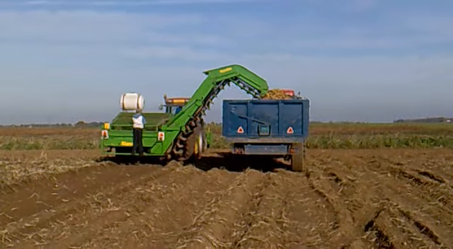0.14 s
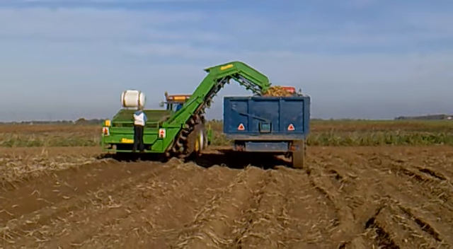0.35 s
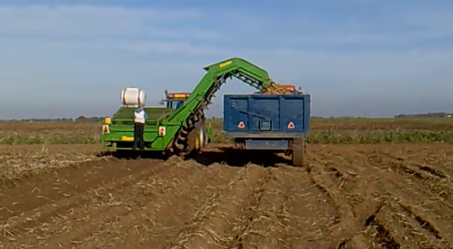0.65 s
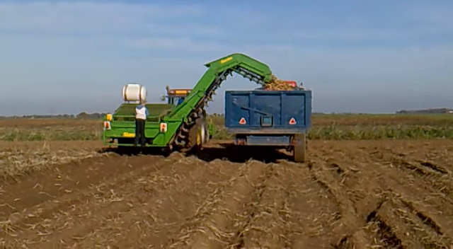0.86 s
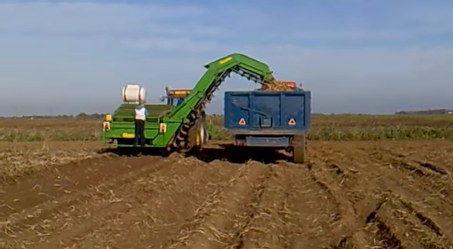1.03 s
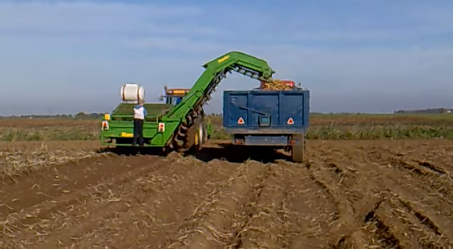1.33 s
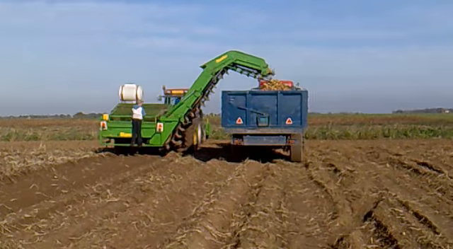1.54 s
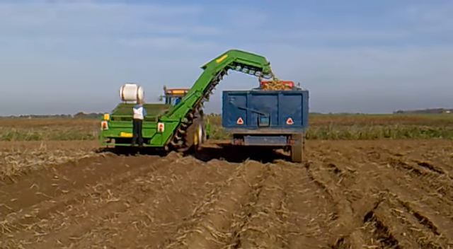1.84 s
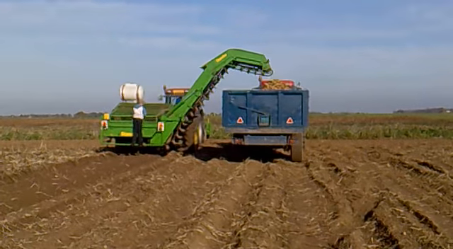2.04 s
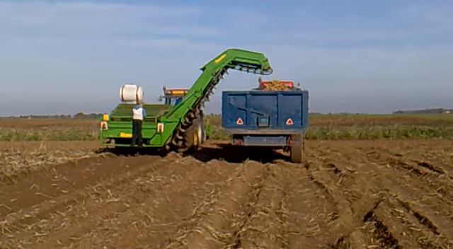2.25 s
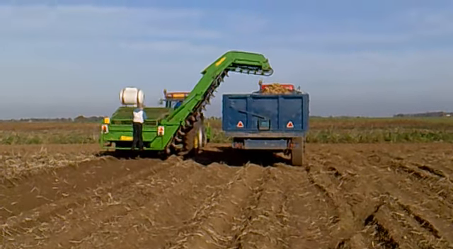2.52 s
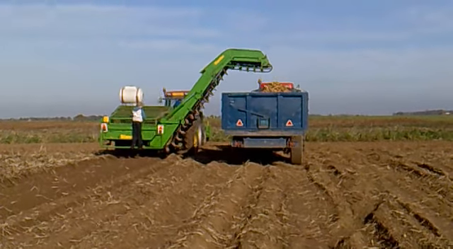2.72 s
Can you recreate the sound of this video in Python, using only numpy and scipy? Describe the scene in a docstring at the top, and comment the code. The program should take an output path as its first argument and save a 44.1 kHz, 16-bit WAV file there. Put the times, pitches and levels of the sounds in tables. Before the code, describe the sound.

A potato harvester clatters and whines faintly over a low tractor diesel drone, some way off in an open field. Strong wind gusts rumble and thump the unprotected microphone, clipping at times, with small dry crunches close by.

```python
"""An open field: a potato harvester and its tractor work some way off, with wind at the microphone.
The tractor is engine tones over low noise; the harvester is shaken, ticking noise with gear whines.
Gusts are shaped noise, and sharp pressure pulses thump the microphone until its signal clips.
Close by, dry crop rustles as spiky noise, and stalks and soil crunch in short bursts of it."""
import sys
import numpy as np
from scipy.fft import rfft, irfft, next_fast_len
from scipy.io import wavfile
from scipy.ndimage import uniform_filter1d, map_coordinates

SR = 44100
rng = np.random.default_rng(int(sys.argv[2]) if len(sys.argv) > 2 else 0)


def to_wav(s):
    """Save 16-bit WAV."""
    ch = np.atleast_2d(s).T  # columns
    pcm = np.round(np.clip(ch, -1, 1) * 32767)  # PCM
    wavfile.write(sys.argv[1], SR, pcm.astype(np.int16))


N = 127008  # length in samples


def amp(db):
    """Decibels to gain."""
    return 10 ** (np.asarray(db) / 20)


def unit(x):
    """Scale to rms 1."""
    return x / np.sqrt(np.mean(x ** 2) + 1e-20)


def noise():
    """White noise as long as the scene."""
    return rng.standard_normal(N)


def seconds():
    """The time of each sample in seconds."""
    return np.arange(N) / SR


def curves(rows):
    """One value per sample for each column after the time."""
    times_s, *columns = np.transpose(rows)
    return [np.interp(seconds(), times_s, column) for column in columns]


def wobble(knots_per_s):
    """A smooth random curve through 1024 knots, read back and forth if they run out."""
    knots = rng.standard_normal(1024)
    return map_coordinates(knots, [seconds() * knots_per_s], mode="mirror")


def filtered(x, response):
    """Multiply the spectrum of x by a gain that depends on frequency."""
    padded = next_fast_len(N + SR // 2)
    gain = response(np.fft.rfftfreq(padded, 1 / SR))
    return irfft(rfft(x, padded) * gain, padded)[:N]


def coloured(x, spectrum):
    """Shape x by (Hz, dB) points joined over log frequency, at rms 1."""
    points_hz, points_db = np.transpose(spectrum)

    def response(hz):
        return amp(np.interp(np.log(hz + 1), np.log(points_hz), points_db))

    return unit(filtered(x, response))


def above(hz, edge_hz, order=4):
    """Gain of a high-pass; with its arguments swapped, nearly that of a low-pass."""
    return 1 / np.sqrt(1 + (edge_hz / (hz + 1)) ** (2 * order))


def tones(lines, drift, flicker_db):
    """Lines of rotating parts: they share the shaft's drift and each fades in the moving air."""
    turns = np.cumsum(1 + drift * wobble(7)) / SR
    out = np.zeros(N)
    for pitch_hz, level_db in lines:
        level = amp(level_db + flicker_db * wobble(14))
        # the root of two gives the sine rms 1
        out += level * np.sqrt(2) * np.sin(2 * np.pi * (pitch_hz * turns + rng.random()))
    return out


def tractor():
    """The diesel's orders are drifting sines over its blurred exhaust drone, a low noise."""
    # engine orders: pitch_hz, level_db (rms, before the flicker)
    engine_orders = [(75.4, -34.5), (134, -35.5), (574, -61), (624.5, -56), (748, -74), (798, -59.5)]
    # colour of the exhaust drone: frequency_hz, relative_db
    drone_colour = [(30, 10), (70, 0.5), (140, 8), (250, -4), (360, -26), (440, -38), (530, -18),
                    (620, -19), (800, -26), (1100, -45), (2000, -75)]
    drone = amp(-37) * coloured(noise(), drone_colour)
    return tones(engine_orders, drift=0.0068, flicker_db=-0.5) + drone


def harvester():
    """Web links and tubers tick against the steel frame, shaken in rhythm, while the gears whine."""
    # loudness of the clatter: time_s, level_db (before trim and wobble)
    work_levels = [(0.03, -47), (0.19, -51.5), (0.45, -45.5), (0.69, -52), (1.3, -48.5), (1.62, -49.5),
                   (1.76, -44.5), (1.86, -46.5), (2.13, -42), (2.25, -47.5), (2.36, -44.5), (2.55, -48.5),
                   (2.85, -50.5)]
    # colour of the clatter: frequency_hz, relative_db
    machine_colour = [(410, -21), (700, 4), (766, 1), (861, -1.5), (1160, -7), (1220, -5.5), (1340, 1),
                      (1450, 0), (1670, -3), (1830, -19.5), (2110, -1), (2460, -18), (2840, -16),
                      (3400, -19), (4640, -15.5), (4950, -20), (6680, -25), (7900, -33), (15500, -29.5)]
    # gear whines: pitch_hz, level_db (rms, before flicker and roughness)
    gear_lines = [(1632, -64), (1652, -57), (2439, -82), (2680, -76), (2781, -75.5), (4106, -78.5),
                  (4650, -73)]
    links_per_s, link_share = 540, 0.22  # share of the power in distinct ticks
    shake_hz, shake_depth = 26.3, 0.081
    trim_db, low_edge_hz = 1.5, 620
    roughness, roughness_per_s = 0.61, 90

    ticks = unit((rng.random(N) < links_per_s / SR) * noise())
    blows = np.sqrt(link_share) * ticks + np.sqrt(1 - link_share) * noise()
    shake_turns = np.cumsum(shake_hz * (1 + 0.045 * wobble(5.65))) / SR
    shake = 1 + shake_depth * np.sin(2 * np.pi * shake_turns)
    clatter = coloured(blows * shake, machine_colour)
    clatter = unit(filtered(clatter, lambda hz: above(hz, low_edge_hz, order=7)))
    whine = tones(gear_lines, drift=0.00291, flicker_db=2.5)
    whine = whine * (1 + roughness * wobble(roughness_per_s))

    work_db, = curves(work_levels)
    return amp(work_db + trim_db + 1.2 * wobble(16)) * clatter + whine


def rustle():
    """Dry crop ticks finely: spiky noise that swells and sinks."""
    # loudness: time_s, level_db (before the wobble)
    rustle_levels = [(0, -65), (1.68, -65), (1.76, -54), (1.86, -75), (1.95, -45.5), (2.07, -57),
                     (2.14, -49), (2.24, -54.5), (2.36, -51), (2.5, -54.5), (2.65, -60.5), (2.88, -55)]
    # colour: frequency_hz, relative_db
    rustle_colour = [(1500, -23), (2500, 0), (3200, -1.5), (4000, 2.5), (4900, 5), (5500, -15), (7000, -11),
                     (8000, -32), (15000, -43)]
    spikiness_db = 2
    level_db, = curves(rustle_levels)
    ticks = noise() * amp(spikiness_db * wobble(3000))
    return amp(level_db + 1.7 * wobble(29.9)) * coloured(ticks, rustle_colour)


def eddies(spectrum, size):
    """Turbulent pressure: noise whose strength is evened out over size samples."""
    x = coloured(noise(), spectrum)
    power = uniform_filter1d(uniform_filter1d(x * x, size), size)
    return unit(x / np.sqrt(np.abs(power) + 1e-3))


def wind():
    """Large eddies rumble at the microphone, small ones flutter, and strong gusts add a hiss."""
    # gusts: time_s, rumble_db, flutter_db (levels before trim and wobble)
    gusts = [(0.02,-18.5,-32.5), (0.05,-19.5,-28.5), (0.19,-29,-39), (0.27,-21,-30.5), (0.295,-13.5,-25),
             (0.36,-28.5,-39), (0.425,-27.5,-46), (0.44,-12.5,-25), (0.463,-6.5,-17.5), (0.49,-22.5,-28.5),
             (0.525,-15,-25.5), (0.6,-20.5,-39), (0.625,-22,-24.5), (0.69,-30,-49), (0.82,-25.5,-31),
             (0.86,-34,-42), (0.905,-24,-26.5), (0.96,-23,-44.5), (1.0,-22.5,-37.5), (1.17,-32.5,-41),
             (1.22,-22.5,-38), (1.36,-24,-35.5), (1.47,-33,-47.5), (1.51,-24.5,-36.5), (1.62,-38,-52.5),
             (1.72,-25,-51), (1.85,-27.5,-47), (1.92,-17.5,-33), (1.95,-10.5,-23.5), (1.99,-21,-40),
             (2.07,-22,-35.5), (2.11,-8.5,-25), (2.17,-17,-24), (2.26,-25,-32.5), (2.32,-18,-18),
             (2.345,-9.5,-13.5), (2.38,-17,-24.5), (2.46,-18,-19.5), (2.53,-22.5,-23.5), (2.69,-33,-27.5),
             (2.73,-23,-26), (2.8,-29,-30), (2.86,-28,-23.5)]
    # colours of the three layers: frequency_hz, relative_db
    rumble_colour = [(12, -14), (25, -11), (45, 1), (75, -2), (130, -0.5), (190, -5), (280, -15),
                     (420, -39.5), (900, -66), (2000, -100)]
    flutter_colour = [(60, -56), (150, -20), (230, 2), (310, 0), (420, -6.5), (600, -15.5), (800, -23),
                      (1200, -41.5), (2000, -44), (5000, -74)]
    hiss_colour = [(300, -16), (1000, 7), (1600, 4.5), (2800, -6.5), (4700, -7.5), (6000, -15), (8000, -20),
                   (15500, -22)]
    rumble_trim_db, flutter_trim_db = -1.5, 1
    hiss_db, hiss_growth = -49, 0.59  # level at rms gust force, exponent on the force

    rumble_db, flutter_db = curves(gusts)
    rumble = amp(rumble_db + rumble_trim_db) * eddies(rumble_colour, size=1800)
    flutter_level = amp(flutter_db + flutter_trim_db + 2.6 * wobble(70))
    flutter = flutter_level * eddies(flutter_colour, size=1200)
    force = unit(amp(rumble_db) + amp(flutter_db))
    hiss = amp(hiss_db) * force ** hiss_growth * coloured(noise(), hiss_colour)
    return rumble + flutter + hiss


def thumps():
    """An eddy hits the microphone port: a sharp suction set in a broad, weak push of equal area."""
    # single eddies: centre_s, level_db (of the suction alone, before random scatter), width_s
    thump_events = [(0.292, -2.5, 0.0014), (0.438, 4, 0.0015), (0.458, -0.5, 0.00081),
                    (0.516, -2.5, 0.0021), (0.614, -7.5, 0.0007), (0.885, -10.5, 0.00086),
                    (0.903, -6.5, 0.00073), (1.935, -7.5, 0.0019), (2.099, 0, 0.0022),
                    (2.346, -0.5, 0.0006), (2.366, -7, 0.0039), (2.447, -14, 0.00052)]
    breadth = 4.6  # width of the push, in widths of the suction
    out = np.zeros(N)
    for centre_s, level_db, width_s in thump_events:
        u = (seconds() - centre_s) / width_s
        push = np.exp(-(u / breadth) ** 2) / breadth
        suction = np.exp(-u ** 2)
        out += amp(level_db + rng.normal()) * (push - suction)
    return out


def stalks():
    """Dry stalks and soil crunch close by: each a short cloud of tiny fractures, made of spiky noise."""
    # crunches: start_s, level_db (before rise and decay), rise_s, decay_s (to fall 60 dB),
    # low_edge_hz, high_edge_hz
    crunch_events = [(0.565, -41, 0.0017, 0.075, 4440, 7000), (0.935, -40.5, .002, 0.029, 3500, 7000),
                     (0.950, -36, 0.0037, 0.063, 3000, 6300), (1.370, -49, .004, 0.065, 4500, 7500),
                     (1.562, -46, .002, 0.046, 3500, 12000), (1.952, -35, 0.0046, .07, 1200, 4530),
                     (1.997, -27.5, .01, .09, 1700, 10500), (2.016, -42, 0.0016, 0.093, 4500, 12000),
                     (2.015, -38.5, 0.0023, 0.29, 1300, 5200), (2.128, -34, 0.0067, 0.051, 3800, 10000),
                     (2.150, -53, .003, .06, 5000, 12000), (2.400, -41.5, 0.0026, 0.066, 5800, 7200),
                     (2.595, -49, .003, .05, 5000, 8000), (2.662, -47, .004, .06, 5500, 8000),
                     (2.724, -41, .005, 0.049, 4630, 6600), (2.793, -45, .003, .05, 5000, 7500)]
    # colour: frequency_hz, relative_db
    crunch_colour = [(500, -25), (1500, 6), (3000, 0), (4800, 0), (6500, -7.5), (8000, -17), (10500, -14),
                     (13000, -43), (16000, -30)]
    spikiness_db = 2.5
    out = np.zeros(N)
    for start_s, level_db, rise_s, decay_s, low_hz, high_hz in crunch_events:
        t = np.maximum(seconds() - start_s, 0)
        grains = coloured(noise() * amp(spikiness_db * wobble(1200)), crunch_colour)
        grains = unit(filtered(grains, lambda hz: above(hz, low_hz) * above(high_hz, hz, order=6)))
        rise = 1 - np.exp(-t / rise_s)  # zero until the start
        out += amp(level_db - 60 * t / decay_s) * rise * grains
    return out


def scene():
    """Machines, crop, ground and wind at one microphone."""
    machines = tractor() + harvester()
    close_by = rustle() + stalks()
    return (machines + close_by + wind() + thumps())[None]


def record(dry):
    """The strongest buffets clip at the microphone; then all above the band limit is removed."""
    clip_level, top_hz = 0.705, 15750  # clip level as a share of full scale
    clipped = np.clip(dry[0], -clip_level, clip_level)
    return filtered(clipped, lambda hz: hz < top_hz)[None]


dry = scene()
out = record(dry)
to_wav(out)
```